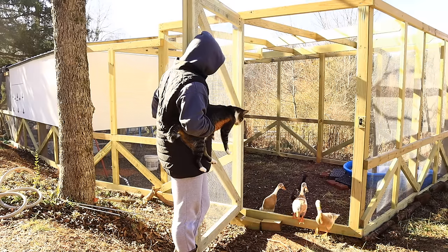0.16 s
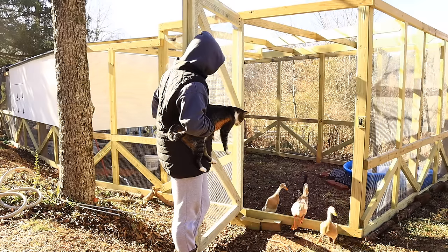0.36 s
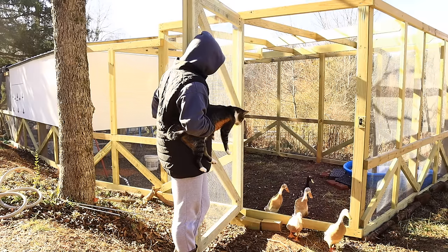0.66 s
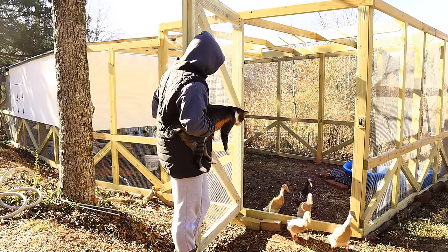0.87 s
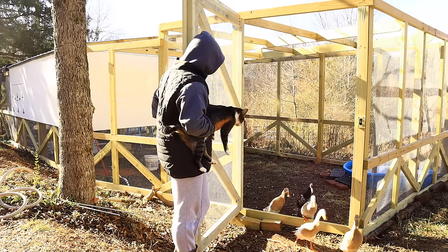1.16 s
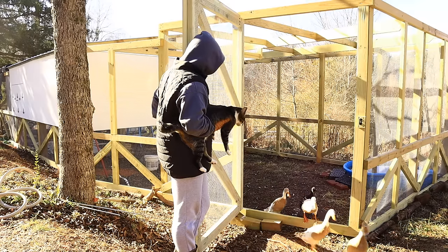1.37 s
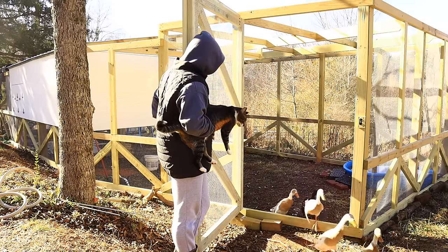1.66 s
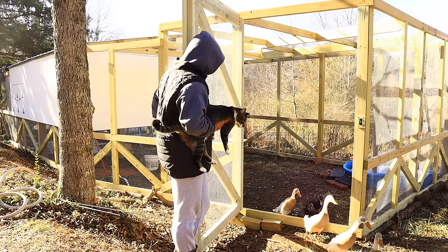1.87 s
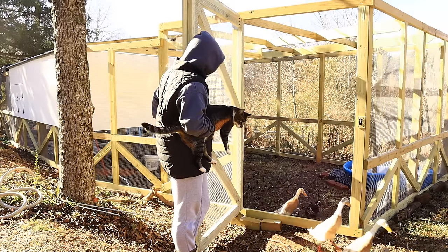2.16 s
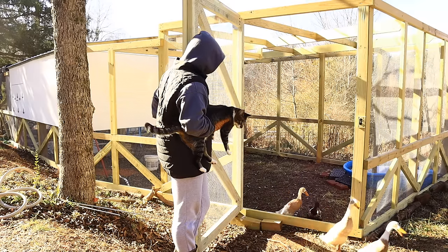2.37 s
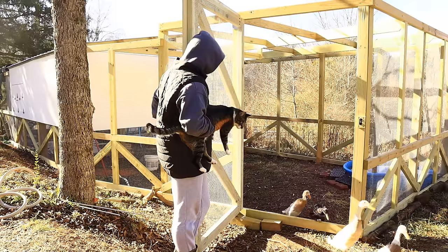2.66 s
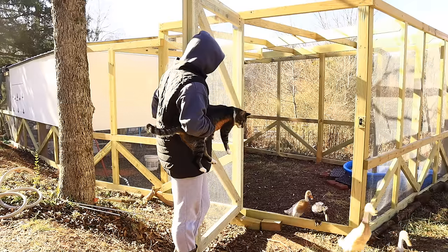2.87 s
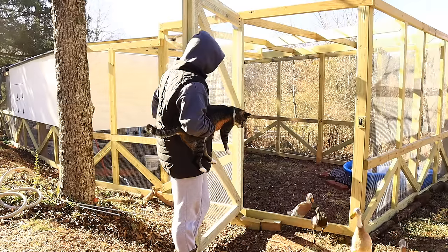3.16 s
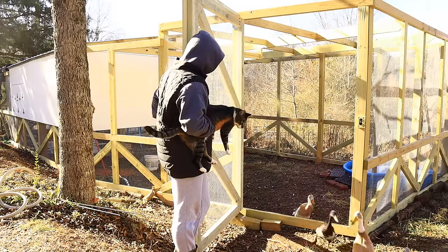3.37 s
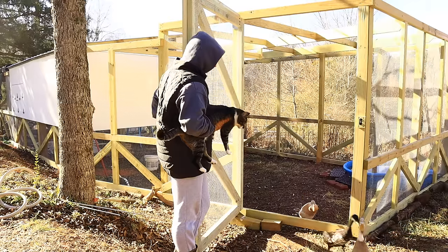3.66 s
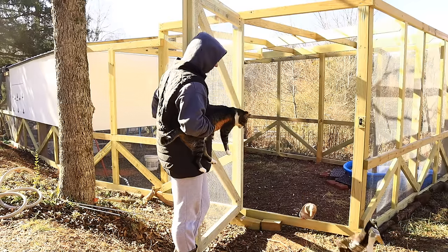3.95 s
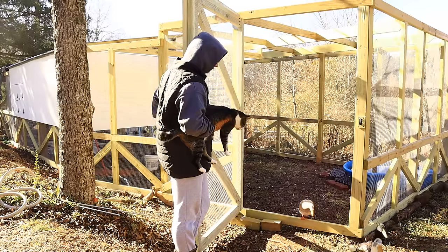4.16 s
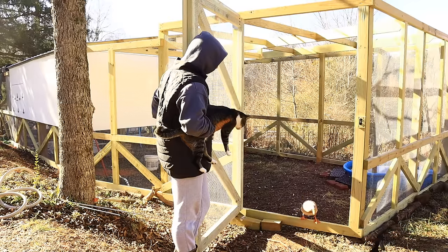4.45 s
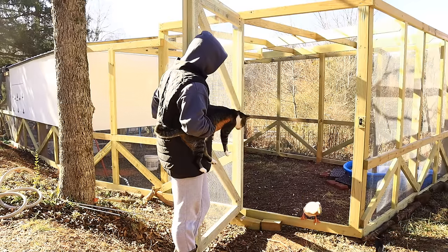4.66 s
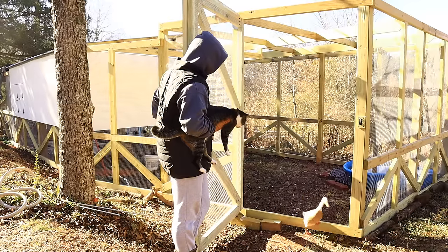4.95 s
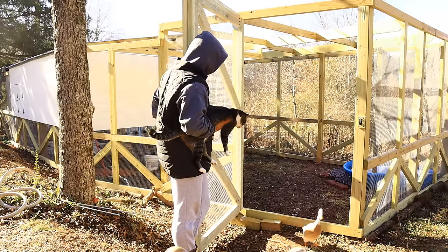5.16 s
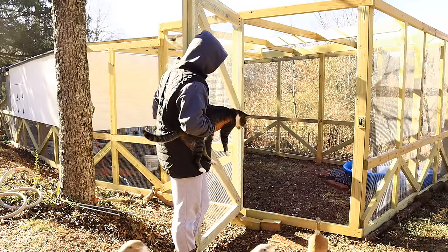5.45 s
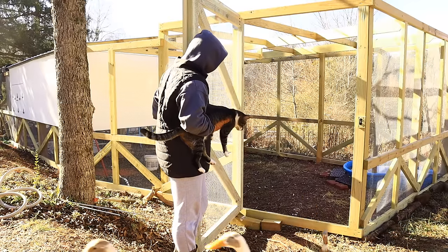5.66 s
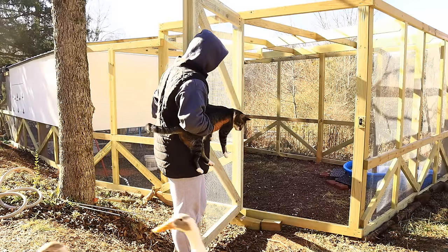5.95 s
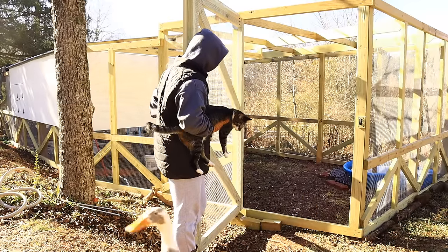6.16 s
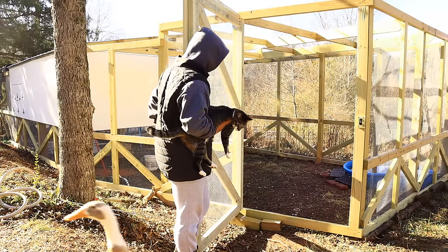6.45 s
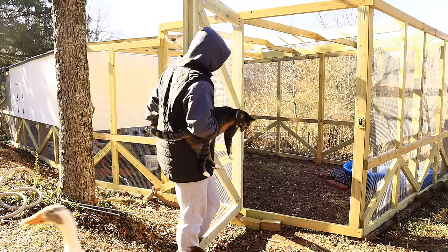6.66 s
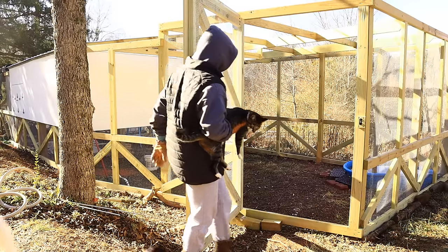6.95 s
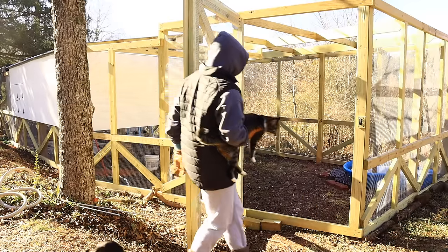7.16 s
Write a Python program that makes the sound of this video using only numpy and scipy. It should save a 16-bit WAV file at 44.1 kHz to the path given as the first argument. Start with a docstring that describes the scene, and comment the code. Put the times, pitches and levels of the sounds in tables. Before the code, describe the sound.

Overlapping hoarse duck quacks, short falling clucks, thin peeps and occasional squeals pass close by, with soft leaf rustle and faint outdoor hush.

```python
"""A small flock of ducks, all calling at once, waddles out of a timber run and past a close microphone pair.
Quacks, drawls, clucks, rasps and squeals are rough pulse trains sent through a throat and an opening beak.
Peeps and faint whistles are gliding tones; feet crunch dry leaves, made of random cracks, over hushed air.
Ground, boards and trees throw back echoes; the flock starts to the right and ends almost straight ahead."""
import sys
import numpy as np
from scipy import signal
from scipy.fft import rfft, irfft, next_fast_len
from scipy.io import wavfile
from scipy.ndimage import map_coordinates

SR = 44100
rng = np.random.default_rng(int(sys.argv[2]) if len(sys.argv) > 2 else 0)


def transcribe(u):
    """Save the signal u as a 16-bit wav file named by the first command-line argument.

    u: samples, shape (n,) or (channels, n), limited to [-1, 1]; the rate is SR.
    q: integer samples, one column per channel.
    """
    v = np.clip(np.atleast_2d(u).T, -1, 1)
    q = np.round(v * 32767).astype(np.int16)
    wavfile.write(sys.argv[1], SR, q)


N = 322371
HZ = np.fft.rfftfreq(2048, 1 / SR)  # grid on which spectra are drawn


def gain_of(db):
    """Decibels to amplitude."""
    return 10 ** (np.asarray(db) / 20)


def evened(x):
    """Scales to rms 1."""
    return x / np.sqrt(np.mean(x ** 2) + 1e-20)


def read(points, hz=HZ):
    """A spectrum joined by straight lines over log frequency."""
    f, value = np.transpose(points)
    return np.interp(np.log(hz + 1), np.log(f + 1), value)


def at_times(points, t):
    """A (time, value) table joined by straight lines."""
    times, values = np.transpose(points)
    return np.interp(t, times, values)


def add(mix, s, sound):
    """Mixes a sound in at time s."""
    part = mix[max(round(s * SR), 0):][:len(sound)]
    part += sound[:len(part)]


def colour(x, db):
    """Causal (minimum-phase) filter with the gain db over HZ."""
    log_gain = np.log(gain_of(np.r_[db, db[-2:0:-1]]))
    response = np.exp(np.conj(signal.hilbert(log_gain)))
    ring = np.fft.ifft(response).real
    return signal.fftconvolve(x, ring[:len(HZ)])[:len(x)]


def waver(size, rate_hz):
    """Smooth random motion, rms 1 before it is cut to size."""
    span = next_fast_len(max(size, SR))
    hz = np.fft.rfftfreq(span, 1 / SR)
    spectrum = rfft(rng.standard_normal(span)) * np.exp(-(hz / rate_hz) ** 2)
    return evened(irfft(spectrum, span))[:size]


def progress(start, end):
    """Runs from 0 to 1 through a call."""
    return np.linspace(0, 1, max(round((end - start) * SR), 2))


def taps(decay_s, count=3000):
    """Sparse echoes of random sign, about count per second, that die away; energy 1."""
    t = np.arange(round(8 * decay_s * SR)) / SR
    kept = rng.random(len(t)) < count / SR
    echoes = rng.choice([-1, 1], len(t)) * kept * np.exp(-t / decay_s)
    return echoes / (np.linalg.norm(echoes) + 1e-12)


# thin gliding peeps: (start t/s, end t/s, first f/Hz, last f/Hz, level/dB); the pitch wavers about the glide
PEEPS = [(0, 0.039, 1700, 1260, -27), (0.147, 0.212, 1327, 1630, -27.5), (0.676, 0.739, 1385, 1770, -32),
         (2.189, 2.229, 1140, 820, -33), (3.245, 3.275, 1210, 886, -26), (3.434, 3.466, 1120, 810, -30),
         (4.034, 4.123, 845, 682, -31), (4.67, 4.728, 1510, 1454, -31), (4.761, 4.78, 930, 830, -27),
         (4.91, 4.974, 1090, 775, -30), (5.025, 5.059, 1457, 794, -29), (5.08, 5.103, 850, 1100, -30),
         (5.666, 5.705, 1276, 850, -26), (5.98, 6.018, 1480, 1700, -29.5), (6.01, 6.031, 1060, 810, -23),
         (6.073, 6.12, 925, 670, -35), (6.865, 6.91, 1540, 904, -28), (7.022, 7.075, 1305, 820, -31.5)]


def peeps():
    """Nearly pure gliding tones with a soft octave above, swelling and fading once."""
    out = np.zeros(N)
    for start, end, first_hz, last_hz, db in PEEPS:
        u = progress(start, end)
        hz = first_hz * (last_hz / first_hz) ** u * (1 + 0.065 * waver(len(u), 180))
        angle = 2 * np.pi * np.cumsum(hz) / SR
        tone = np.sin(angle) + 0.26 * np.sin(2 * angle)
        add(out, start, gain_of(db) * evened(tone) * np.sin(np.pi * u))
    return out


# faint high whistles that all slide down alike: (start t/s, level/dB)
WHISTLES = [(0, -43), (1.3, -40), (3.98, -55), (5.98, -45), (6.72, -61)]
WHISTLE_S, WHISTLE_HZ, WHISTLE_SAG_HZ_PER_S = 0.33, 3490, 890


def whistles():
    """A thin, soft, slightly wavering tone slides down now and then behind the flock."""
    out, u = np.zeros(N), progress(0, WHISTLE_S)
    for start, db in WHISTLES:
        slide_hz = WHISTLE_HZ - WHISTLE_SAG_HZ_PER_S * WHISTLE_S * u
        hz = slide_hz * (1 + 0.0083 * waver(len(u), 60))
        tone = np.sin(2 * np.pi * np.cumsum(hz) / SR)
        add(out, start, gain_of(db) * evened(tone * np.sin(np.pi * u)))
    return out


# resting colour of the leaves: (f/Hz, relative level/dB)
LEAVES = [(300, 12), (1500, 8), (5500, 5.5), (10500, 17.5), (15000, -9.5)]
# how busily feet stir the leaves: (t/s, relative level/dB)
SHUFFLE = [(0, -61), (.12, -39), (.25, -54), (1.8, -55), (2.6, -45), (3.05, -40), (3.369, -45.5),
           (3.7, -44), (4.8, -44), (5.9, -40.5), (6.3, -45.5), (7.3, -46)]
# single leaves and twigs snapping: (t/s, relative level/dB)
SNAPS = [(0.0926, -19.5), (0.125, -25), (2.16, -28.5), (2.835, -24.5), (2.8787, -31), (3.035, -26.5),
         (3.1813, -46), (4.166, -30), (6.04, -25)]


def leaves(grains_per_s=1800, shuffle_db=8.5, snap_db=-3, surge_db=5, surge_hz=9):
    """Feet crush dry leaves into tiny cracks of unequal size; now and then one snaps."""
    cracks = rng.standard_normal(N) * gain_of(4.52 * np.minimum(rng.exponential(1, N), 5))
    cracks *= rng.random(N) < grains_per_s / SR
    t = np.arange(SR // 20) / SR
    # each crack leaves a burst of noise that dies away
    power = abs(signal.fftconvolve(cracks ** 2, np.exp(-t / 0.0017))[:N])
    crumple = np.sqrt(power) * rng.standard_normal(N)
    level_db = shuffle_db + at_times(SHUFFLE, np.arange(N) / SR)
    out = evened(colour(crumple, read(LEAVES))) * gain_of(level_db)
    # the rustle swells and thins at random
    out *= gain_of(surge_db * waver(N, surge_hz))
    for s, db in SNAPS:
        burst = rng.standard_normal(len(t)) * np.exp(-t / 0.0087)
        add(out, s, gain_of(db + snap_db) * colour(burst, read(LEAVES)))
    return out


# resting colour of the air: (f/Hz, relative level/dB)
AIR = [(20, -33), (62, 5.5), (95, -3.5), (200, -0.5), (450, -15), (1300, -10), (15000, -78)]


def air(air_db=-45, fade_db=-7):
    """The low hush of the open yard: coloured noise, slowly dying down."""
    hush = evened(colour(rng.standard_normal(N), read(AIR)))
    return gain_of(air_db + np.linspace(0, fade_db, N)) * hush


# turbulence is weak below this frequency, so the low harmonics stay clean
PUFF_LOW_HZ = 830


def syrinx(hz, rough, jitter=.032, rasp=.85):
    """Uneven membrane pulses, each followed by a puff of turbulent air."""
    size = len(hz)
    turns = np.cumsum(hz * (1 + jitter * rough * waver(size, 240))) / SR
    from_pulse = (turns % 1 - .5) * SR / hz  # in samples
    pulses = np.sinc(from_pulse) * np.exp(-(from_pulse / 10) ** 2)
    pulses = pulses * (1 + 0.53 * rough * waver(size, 320))
    puffs = (.1 + np.exp(-((turns - .5) % 1) / .3)) * rng.standard_normal(size)
    puffs = signal.lfilter(*signal.butter(1, PUFF_LOW_HZ, "high", fs=SR), puffs)
    return (1 - rough) * evened(pulses) + rasp * rough * evened(puffs)


def smear(x):
    """Random dense taps, mostly flattened, spread each pulse over a few ms and soften its peak."""
    response = rfft(taps(.0024, count=16000), 2048)
    ring = irfft(response / (abs(response) + .05) ** .7)  # flattens most of the colour
    return signal.fftconvolve(x, np.fft.fftshift(ring), "same")


# every voice: rise time of the onset, and how far the resonances arch as the beak opens
ATTACK_S, MOUTH_SWING = 0.013, .13


def call(hz, rough, throat, beak_hz, bright_db=0, late=1, beak_db=14, beak_width_hz=900):
    """A pulse train through throat and beak; the resonances arch and sink as the beak opens and shuts."""
    u = np.linspace(0, 1, len(hz))
    effort = abs(np.sin(np.pi * u ** late))
    shape_db = read(throat) + beak_db * np.exp(-((HZ - beak_hz) / beak_width_hz) ** 2 / 2)
    shape_db += bright_db * np.interp(HZ, [2400, 3200], [0, 1])
    # the throat runs on its own clock: a faster clock lifts all its resonances but not the pitch
    mouth = 1 + MOUTH_SWING * (np.sin(np.pi * u) - u - .5)
    clock = np.cumsum(mouth)
    throat_hz = np.interp(np.arange(clock[-1]), clock, hz / mouth)
    voice = smear(colour(syrinx(throat_hz, rough), shape_db))
    voice = evened(map_coordinates(voice, [clock], mode="nearest"))
    # the treble opens only once the bird pushes hard
    mellow = signal.sosfiltfilt(signal.butter(2, 2600, fs=SR, output="sos"), voice)
    onset = np.minimum(np.arange(len(hz)) / SR / ATTACK_S, 1)
    treble = 1.83 * onset * effort ** 0.48 * (voice - mellow)
    return onset * effort ** 0.85 * (mellow + treble)


# a hen's throat at her usual pitch: (f/Hz, relative level/dB)
HEN = [(40, -22), (220, 2), (480, -8.5), (850, -9), (1400, -7.5), (1750, -12), (2350, -12.5), (2950, -13.5),
       (3400, -9.5), (4300, -10), (5400, -11.5), (6800, -18), (10000, -38.5), (15000, -98)]
# the hens' treble, and the level of a narrow band near 5.9 kHz, over time:
# (t/s, added treble level/dB, added band level/dB)
TREBLE = [(0, 4.5, 8), (.9, 2.5, 4.5), (1.3, 3, -1), (2.4, 2.5, -3.5), (3.5, 0, 2), (4.4, 4.5, -10.5),
          (6.2, 1.5, 7), (7.3, -2, -12)]
BAND_HZ, BAND_WIDTH_HZ = 5850, 490
# louder calls are brighter (dB of treble per dB of level)
USUAL_LEVEL_DB, BRIGHT_PER_LEVEL = -12.5, 0.43
# a hen tightens her throat for higher calls: resonances rise as this power of the pitch
USUAL_PITCH_HZ, THROAT_FOLLOW = 237.5, 0.14
# higher quacks and drawls come with a wider beak and so a higher beak resonance (Hz per Hz)
BEAK_PER_PITCH = 5.4


def hen(start, hz, db, rough, beak_hz, bright_db=0, late=1):
    """One hen's call at its level; louder calls are brighter and higher ones tighten the throat."""
    times, treble_db, band_db = np.transpose(TREBLE)
    bright_db = bright_db + BRIGHT_PER_LEVEL * (db - USUAL_LEVEL_DB) + np.interp(start, times, treble_db)
    band = np.interp(start, times, band_db) * np.exp(-((HZ - BAND_HZ) / BAND_WIDTH_HZ) ** 2 / 2)
    tightening = (np.median(hz) / USUAL_PITCH_HZ) ** THROAT_FOLLOW
    throat = np.c_[HZ, read(HEN, HZ / tightening) + band]
    return gain_of(db) * call(np.maximum(hz, 90), np.clip(rough, 0, 1), throat, beak_hz, bright_db, late)


# clucks, short calls that drop in pitch:
# (start t/s, end t/s, middle pitch f/Hz, level/dB, beak resonance f/Hz)
CLUCKS = [(.009, 0.174, 201.3, -25.5, 1510), (0.458, 0.53, 210, -22.5, 1890),
          (0.519, 0.598, 216.4, -22, 1590), (0.593, 0.64, 241.8, -29, 1280),
          (0.712, 0.792, 216.3, -21, 1510), (1.447, 1.513, 226.2, -24.5, 1760),
          (1.608, 1.651, 196.4, -27, 1380), (1.659, 1.709, 206, -25.5, 1680),
          (1.831, 1.906, 208.2, -23.5, 1540), (2.196, 2.274, 201, -27, 1800),
          (3.057, 3.166, 177.6, -25, 1500), (3.616, 3.693, 187.5, -21, 1420),
          (3.954, 4.023, 207, -21.5, 1640), (4.134, 4.254, 238.6, -18, 1750), (4.708, 4.78, 166, -25, 1540),
          (4.848, 4.939, 247.3, -20, 1720), (4.926, 5.01, 204.8, -22.5, 1470),
          (5.014, 5.107, 209.2, -24.5, 1900), (5.096, 5.159, 206.8, -19, 1730),
          (5.369, 5.465, 240, -16.5, 1930), (5.505, 5.587, 187.5, -25, 1300),
          (5.579, 5.63, 165.2, -22.5, 1680), (5.668, 5.805, 188.5, -20, 1440),
          (5.999, 6.094, 201.4, -19, 1660), (6.146, 6.243, 206.6, -17, 1910),
          (6.332, 6.393, 229, -17.5, 1750), (6.454, 6.51, 186, -23.5, 1400), (6.684, 6.707, 189, -30, 1440),
          (7.027, 7.143, 236.3, -24, 1560)]
# the glide's start and the low pitch it heads for (multiples of the middle pitch), and its decay rate per call
CLUCK_HIGH, CLUCK_LOW, CLUCK_FALL = 1.55, .55, 1.7
CLUCK_ROUGH, CLUCK_BRIGHT_DB = 0.58, -3.5


def clucks():
    """Each falls from a high start towards a creak, steeply at first."""
    out = np.zeros(N)
    for start, end, middle_hz, db, beak_hz in CLUCKS:
        fall = np.exp(-CLUCK_FALL * progress(start, end))
        hz = middle_hz * (CLUCK_LOW + (CLUCK_HIGH - CLUCK_LOW) * fall)
        add(out, start, hen(start, hz, db, CLUCK_ROUGH, beak_hz, CLUCK_BRIGHT_DB, late=0.86))
    return out


# full quacks: (start t/s, end t/s, top pitch f/Hz, share of the pitch lost by the end, level/dB,
# lateness of the swell: 1 = centred)
QUACKS = [(0.184, 0.322, 222.1, 0.53, -17, 0.63), (0.341, 0.425, 198.2, 0.61, -20, 0.91),
          (.888, 1.022, 239.7, 0.49, -16, 0.62), (1.105, 1.215, 263.7, 0.5, -17.5, 0.73),
          (1.14, 1.312, 218, 0.18, -21, 0.67), (1.479, 1.609, 260.6, 0.23, -15.5, 0.72),
          (1.682, 1.815, 254.3, 0.73, -18, 0.57), (2.021, 2.192, 251.6, 0.47, -18.5, 0.84),
          (2.338, 2.49, 241.3, 0.23, -17.5, 1.18), (2.542, 2.651, 223.2, 0.19, -21, 0.65),
          (2.698, 2.839, 274.9, 0.51, -17, 0.64), (2.908, 3.012, 263.8, 0.77, -21.5, 0.49),
          (3.424, 3.627, 276, 0.5, -18, 1.23), (3.688, 3.848, 295.7, 0.59, -18, .62),
          (4.76, 4.88, 210.9, 0.48, -22, 0.86), (5.793, 5.919, 248, 0.45, -16, 1),
          (6.516, 6.597, 253.7, 0.37, -16, 0.87), (6.707, 6.85, 221.1, 0.97, -16, 0.48),
          (6.895, 7.001, 234.4, 0.74, -18, .73), (7.167, 7.322, 246, 0.53, -14, 0.54)]
# pitch crests ahead of the loudness, after this share of the time that the swell takes
CREST_LEAD = .65
# the further a quack sags, the rougher it gets (roughness 0-1)
QUACK_ROUGH, ROUGH_PER_SAG, QUACK_BEAK_HZ = 0.34, 0.31, 1930


def quacks():
    """The pitch crests before the loudness does, then sags; deeper sags are rougher."""
    out = np.zeros(N)
    for start, end, top_hz, sag, db, late in QUACKS:
        crest = CREST_LEAD * .5 ** (1 / late)
        hz = top_hz * (1 - sag * ((progress(start, end) - crest) / (1 - crest)) ** 2)
        beak_hz = QUACK_BEAK_HZ + BEAK_PER_PITCH * (top_hz - USUAL_PITCH_HZ)
        add(out, start, hen(start, hz, db, QUACK_ROUGH + ROUGH_PER_SAG * sag, beak_hz, late=late))
    return out


# drawn-out calls that creep upwards: (start t/s, end t/s, middle pitch f/Hz, level/dB)
DRAWLS = [(0.755, 0.954, 140.8, -25), (1.917, 2.101, 227, -20), (2.245, 2.417, 226.7, -20.5),
          (3.78, 3.98, 222, -19.5), (4.185, 4.438, 225.1, -18)]
# rise is a share of the middle pitch
DRAWL_RISE, DRAWL_ROUGH, DRAWL_LATE, DRAWL_BEAK_HZ, DRAWL_BRIGHT_DB = .09, 0.51, 1.09, 2120, -5


def drawls():
    """Long, duller calls that swell slightly late on a nearly level pitch."""
    out = np.zeros(N)
    for start, end, middle_hz, db in DRAWLS:
        hz = middle_hz * (1 + DRAWL_RISE * (progress(start, end) - .5))
        beak_hz = DRAWL_BEAK_HZ + BEAK_PER_PITCH * (middle_hz - USUAL_PITCH_HZ)
        add(out, start, hen(start, hz, db, DRAWL_ROUGH, beak_hz, DRAWL_BRIGHT_DB, DRAWL_LATE))
    return out


# the drake's throat: (f/Hz, relative level/dB)
DRAKE = [(60, -30), (190, -4.5), (400, -17), (850, -15.5), (1230, -7), (1600, -11.5), (2200, -14),
         (6500, -21), (14000, -54)]
# the drake's rasps: (start t/s, end t/s, pulse rate f/Hz, level/dB)
RASPS = [(1.31, 1.449, 193.7, -20), (2.82, 2.955, 167, -24), (3.175, 3.313, 177.8, -31.5),
         (4.57, 4.728, 173.7, -27), (5.127, 5.227, 168.2, -22), (5.888, 5.96, 149.3, -20)]


def drake():
    """A slow, hoarse rattle in one strong resonance."""
    out = np.zeros(N)
    for start, end, pulse_hz, db in RASPS:
        hz = pulse_hz * np.ones_like(progress(start, end))
        add(out, start, gain_of(db) * call(hz, 0.66, DRAKE, 1080))
    return out


# the throat in a squeal: (f/Hz, relative level/dB)
SQUEAL = [(400, -8.5), (1100, -3), (2300, 8), (3000, -4), (3900, -10), (14000, -66)]
# arched squeals in the high register: (start t/s, end t/s, top pitch f/Hz, level/dB)
SQUEALS = [(3.238, 3.313, 459, -29), (3.389, 3.503, 546, -29.5), (5.072, 5.138, 522, -25.5),
           (5.272, 5.373, 515, -22), (5.606, 5.678, 526, -23.5), (6.371, 6.449, 515, -27)]
# share of the top pitch gained on the way up, place of the crest 0-1
SQUEAL_ARCH, SQUEAL_CREST = 0.24, 0.62
SQUEAL_BEAK_HZ, SQUEAL_ROUGH = 2400, .27


def squeals():
    """High calls whose wavering pitch arches up to a late crest and down."""
    out = np.zeros(N)
    for start, end, top_hz, db in SQUEALS:
        hz = top_hz * (1 - SQUEAL_ARCH * (progress(start, end) / SQUEAL_CREST - 1) ** 2)
        hz = hz * (1 + 0.0247 * waver(len(hz), 105))
        voice = call(hz, SQUEAL_ROUGH, SQUEAL, SQUEAL_BEAK_HZ, beak_width_hz=880)
        add(out, start, gain_of(db) * voice)
    return out


# the bounce off the ground lags most late on, as the flock comes near: (t/s, lag/ms)
GROUND_LAG = [(0, 0.92), (4.4, 0.66), (5.5, 1.7), (7.3, 1.62)]
GROUND_DB, GROUND_TOP_HZ = -13.5, 1570


def ground(x):
    """The direct sound plus one dull bounce off the earth."""
    n = np.arange(N)
    lag = at_times(GROUND_LAG, n / SR) * SR / 1000  # in samples
    delayed = np.interp(n - lag, n, x)
    bounce = signal.lfilter(*signal.butter(1, GROUND_TOP_HZ, fs=SR), delayed)
    return x + gain_of(GROUND_DB) * bounce


def yard(x, near_db=-8, far_db=-25, far_s=0.19):
    """Scatter from ground and boards, which changes as the birds move, and a faint tail from the trees."""
    echoes = gain_of(far_db) * signal.fftconvolve(x, taps(far_s))[:N]
    # overlapping windows, each with a fresh near scatter
    step = SR // 8
    for at in range(0, N, step):
        part = x[at:at + 2 * step]
        part = part * np.hanning(2 * step)[:len(part)]
        add(echoes, at / SR, gain_of(near_db) * signal.fftconvolve(part, taps(.004)))
    # little bass comes back
    return signal.lfilter(*signal.butter(1, [600, 6000], "band", fs=SR), echoes)


# where the callers are from the microphones: (t/s, bearing; 1 = at the right, 0 = ahead)
BEARING = [(0, 0.57), (5.3, 1), (5.7, 0.47), (7.3, 0.15)]


def microphones(x, side_hz=2400, side_phase_rad=0.37, wide_hz=4300):
    """Two close ports: their difference grows with frequency and bearing, and is spread to left and right."""
    hz, t, z = signal.stft(x, SR, nperseg=512)
    bearing, hz = at_times(BEARING, t), hz[:, None]
    side = bearing * hz / side_hz * np.exp(1j * side_phase_rad)
    side = side + 1j * (hz / wide_hz) ** 1.89  # width whatever the bearing
    pair = np.array([1 - side, 1 + side]) * z / np.hypot(1, abs(side))
    return signal.istft(pair, SR)[1][:, :N]


def scene():
    """Calls direct and off the ground, with whistles, leaves and air, and separate scatter on each side."""
    calls = quacks() + drawls() + clucks() + drake() + peeps() + squeals()
    flock = ground(calls) + whistles() + leaves()
    return microphones(flock + air()) + np.array([yard(flock), yard(flock)])


EDGE_HZ = 15900


def record(dry):
    """The loudest peaks are rounded off near full scale; then the band limit."""
    rounded = dry / (1 + (dry / .92) ** 4) ** .25
    lowpass = signal.firwin(511, EDGE_HZ, window=("kaiser", 9), fs=SR)
    return signal.oaconvolve(rounded, lowpass[None], "same")


dry = scene()
out = record(dry)
transcribe(out)
```